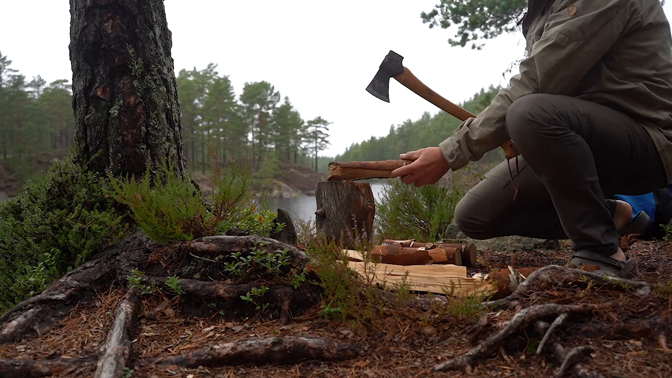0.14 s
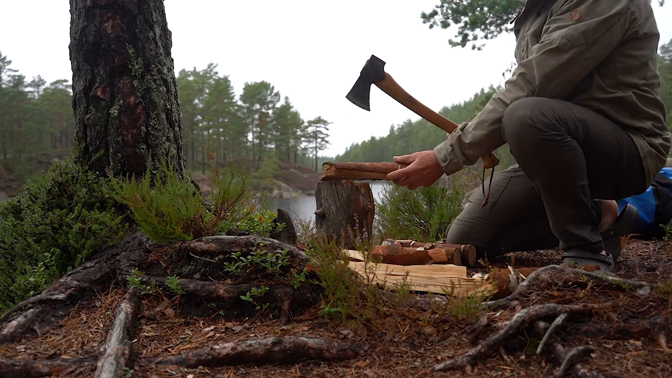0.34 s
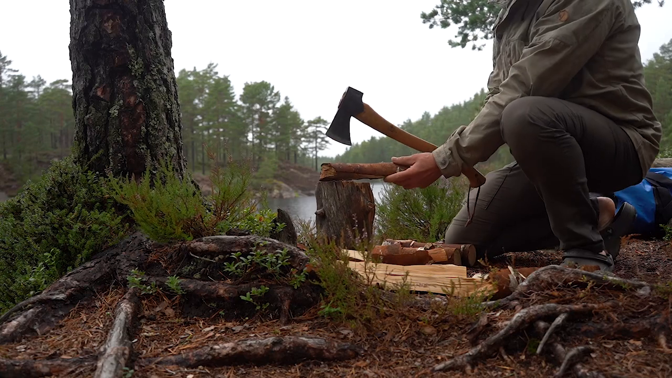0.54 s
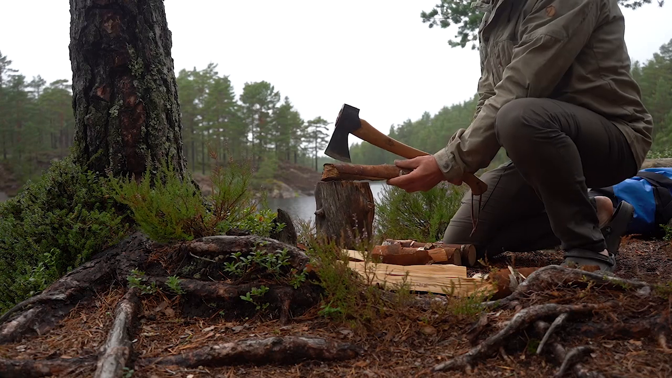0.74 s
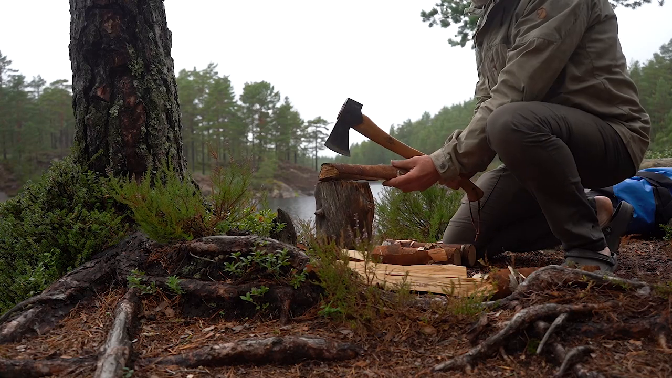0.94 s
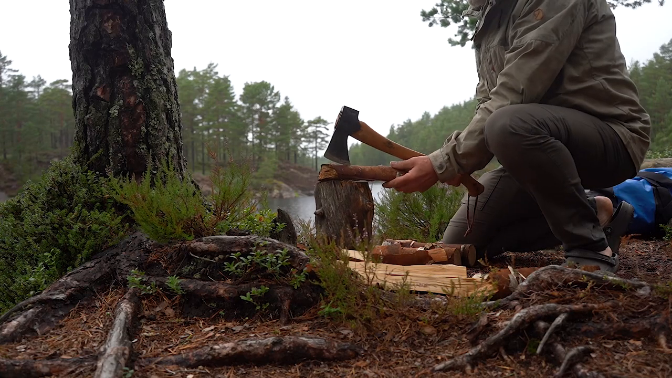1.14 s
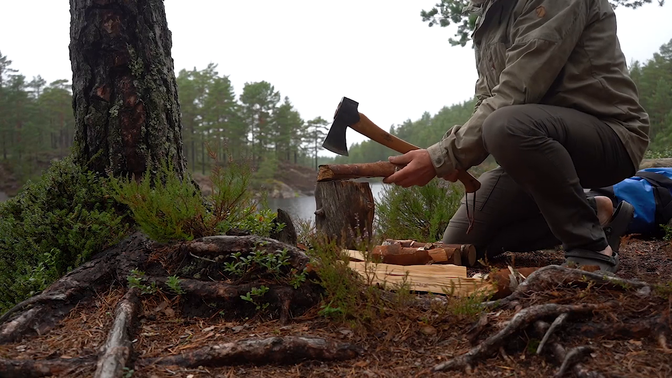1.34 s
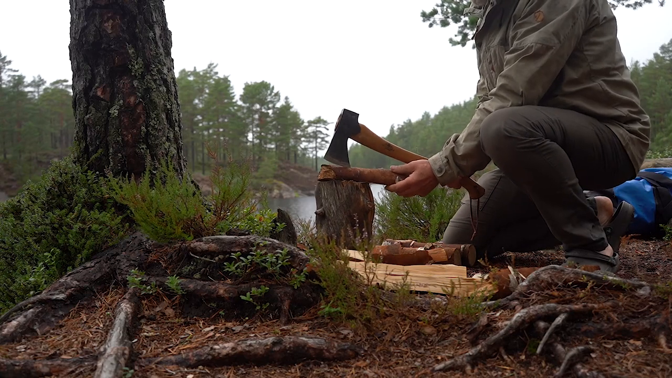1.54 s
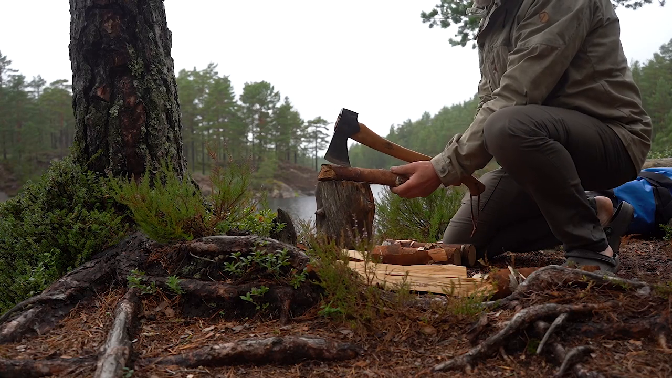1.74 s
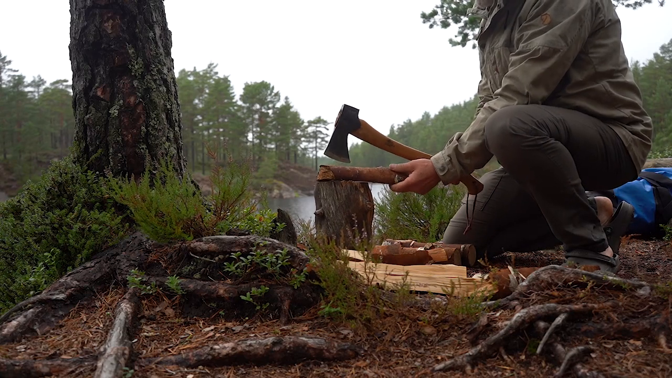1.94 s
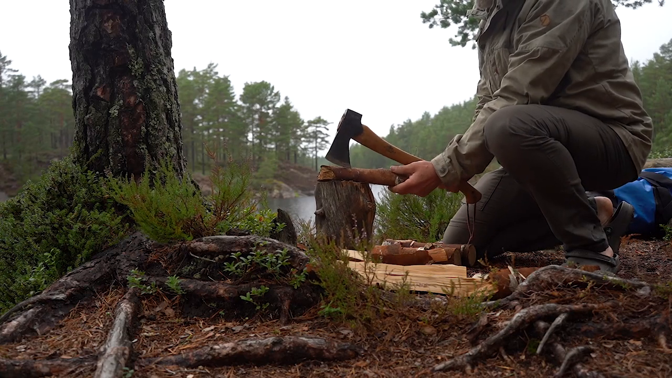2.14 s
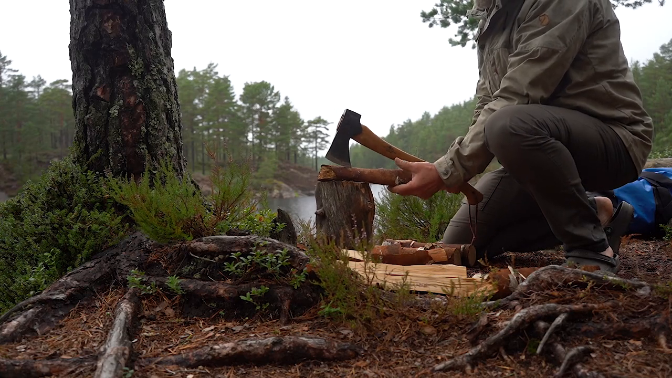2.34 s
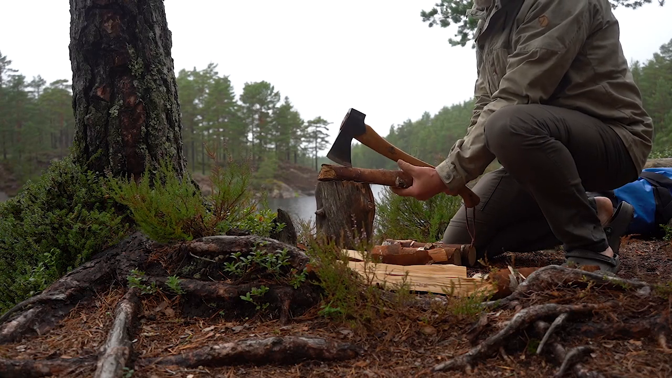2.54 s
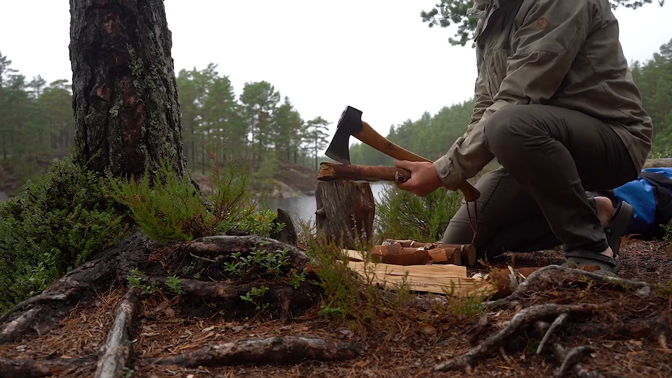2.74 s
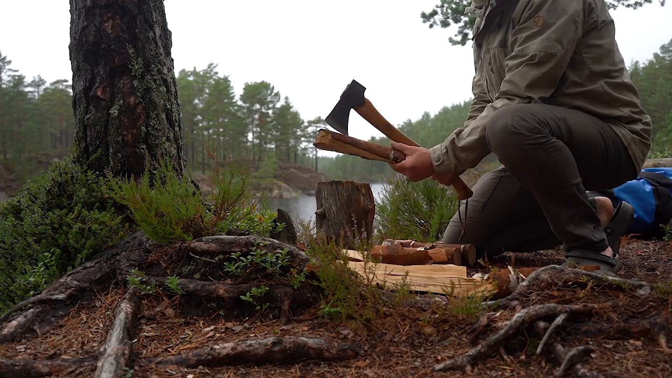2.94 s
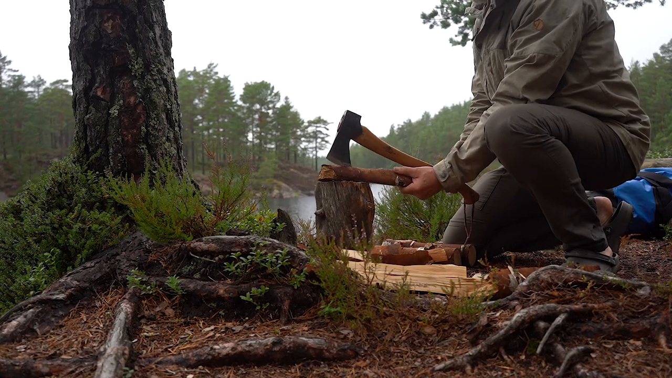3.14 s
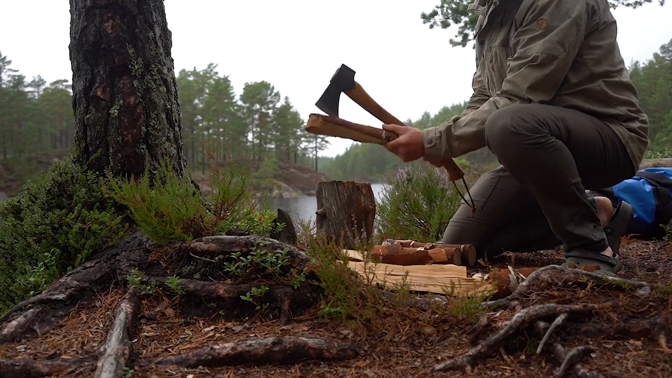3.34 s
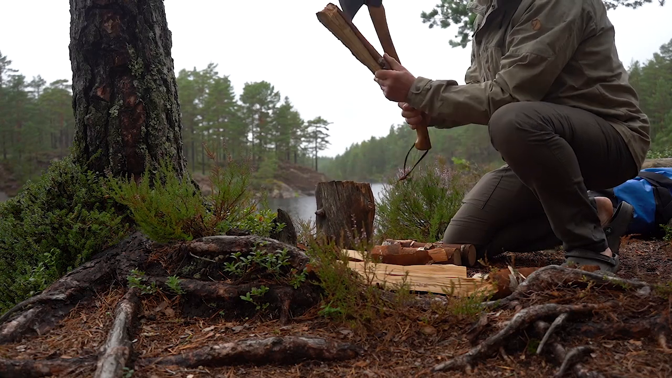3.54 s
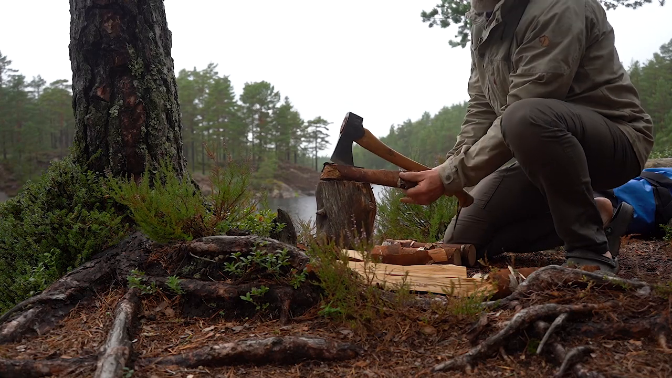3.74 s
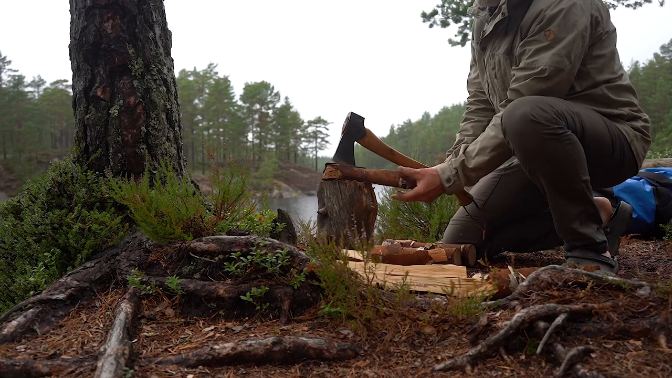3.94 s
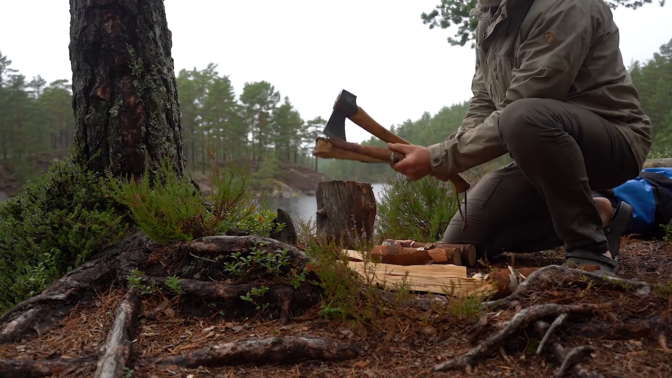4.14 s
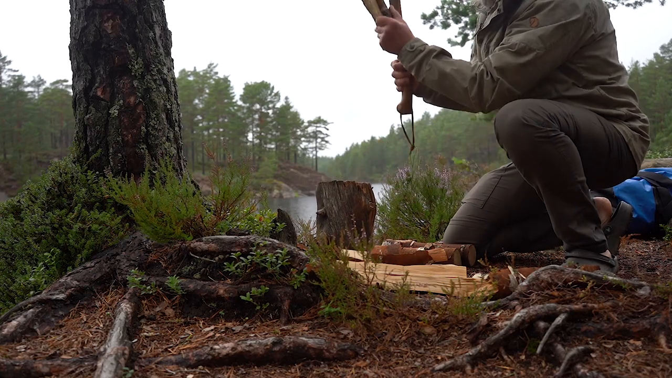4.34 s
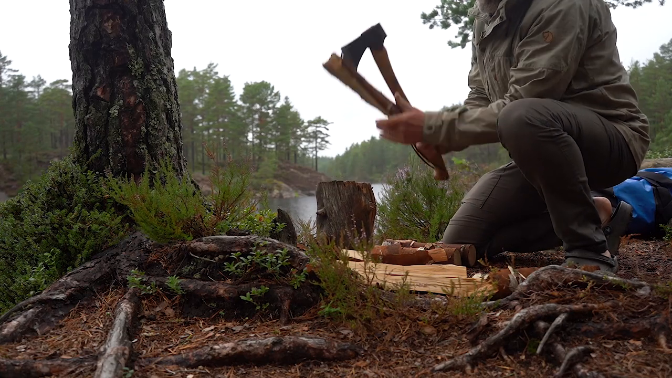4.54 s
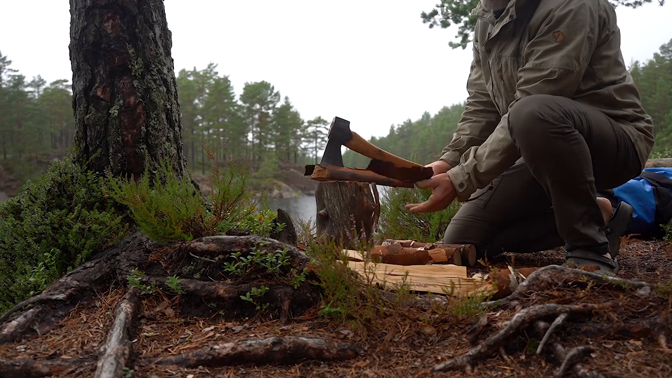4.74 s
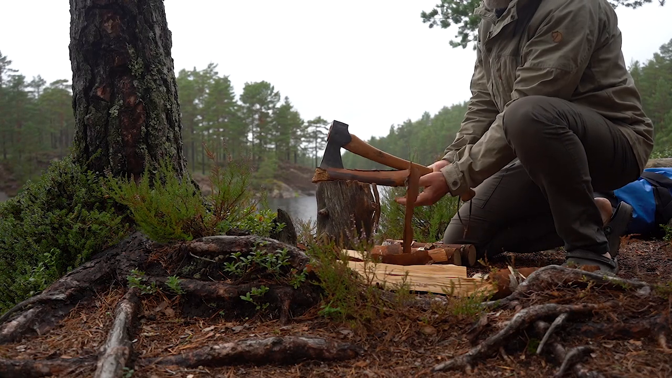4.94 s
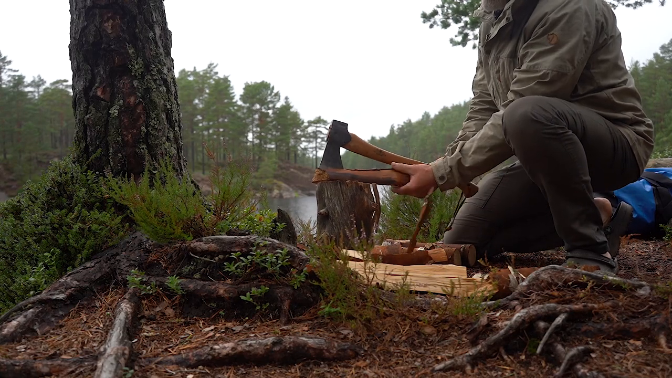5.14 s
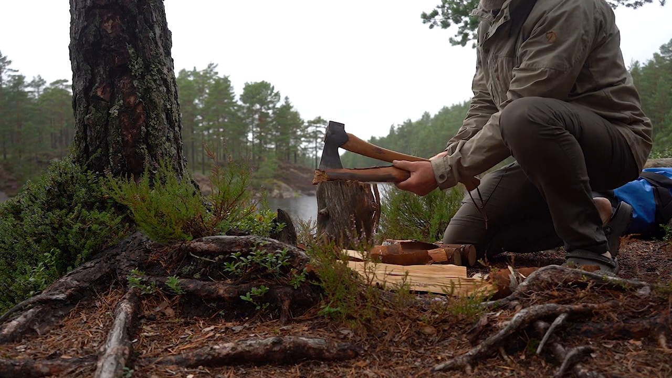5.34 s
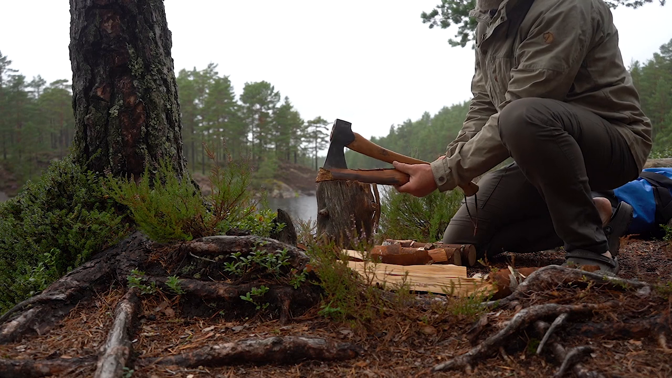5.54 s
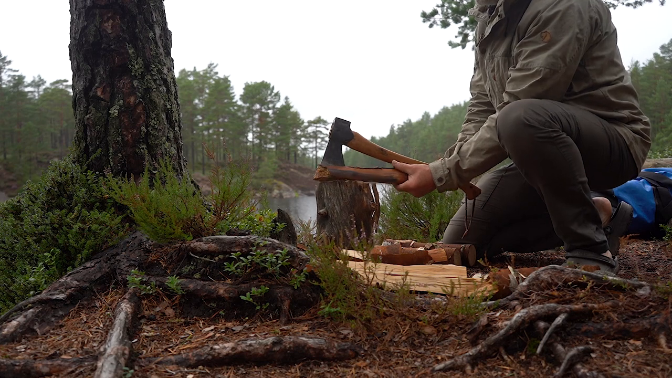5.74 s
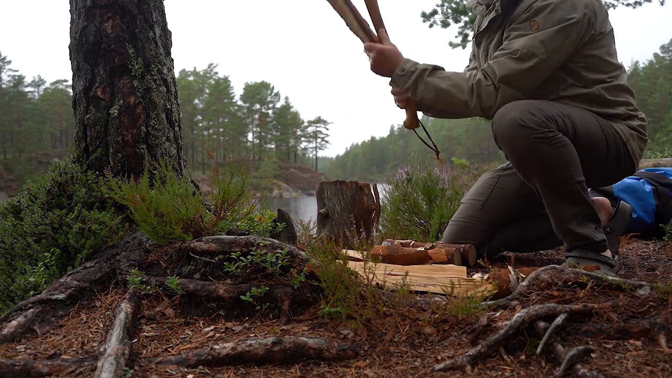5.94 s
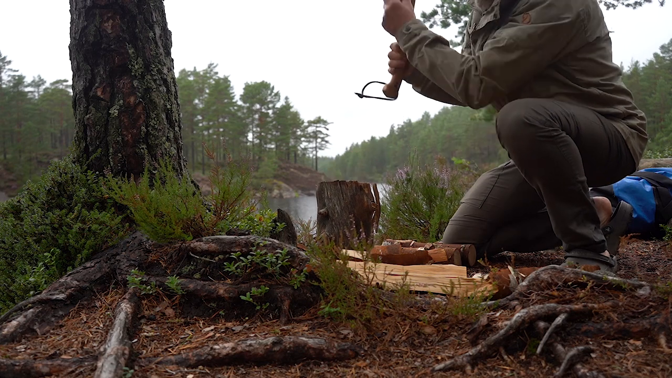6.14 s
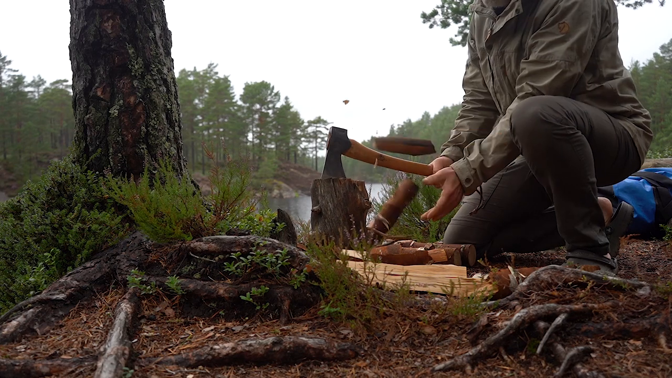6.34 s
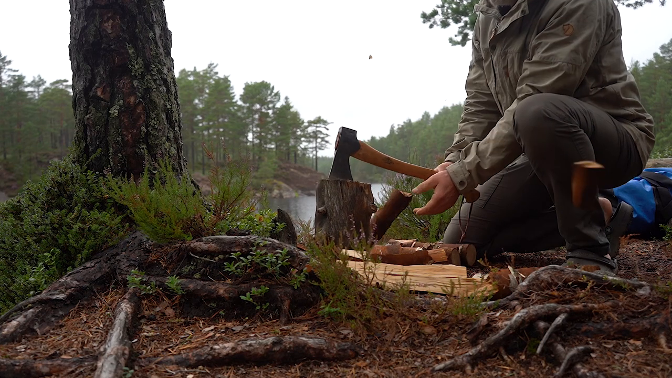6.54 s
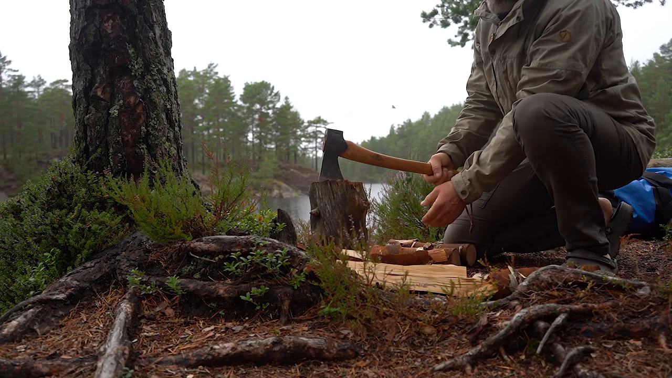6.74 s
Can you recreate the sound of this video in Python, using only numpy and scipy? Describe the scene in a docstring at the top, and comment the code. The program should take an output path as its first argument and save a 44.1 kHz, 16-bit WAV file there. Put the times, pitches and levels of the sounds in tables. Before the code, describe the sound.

In quiet woods, a kneeling person handles a stick and hatchet: cloth swishes, needles crunch, small knocks. Gentle taps seat the blade, a medium chop follows, then three strong woody cracks come over a second apart, with deep short thuds and brief trailing reflections from ground and trees. Split wood knocks and rings at the end. Near microphone, dry open air, work a little to the right.

```python
"""Splitting kindling by a lake

Someone kneels at a stump in a lakeside wood, to the right of the microphone, splitting kindling with a hatchet.
Light taps seat the blade, then heavy blows part the wood: bursts of noise and damped modes of billet and steel.
The stump thuds and soft ground thumps as low modes; loose wood knocks and rings, twigs snap, rough grain slips.
Jacket, litter and shuffling knees are shaped noise; delayed noise tails are the ground's and trees' answer."""
import sys
import numpy as np
from scipy import signal
from scipy.fft import rfft, irfft, next_fast_len
from scipy.io import wavfile
from scipy.ndimage import map_coordinates

SR = 44100
rng = np.random.default_rng(int(sys.argv[2]) if len(sys.argv) > 2 else 0)


def inscribe(sig):
    """Save sig as 16-bit PCM at rate SR to the path in sys.argv[1].

    A 1-D sig is mono; a 2-D sig holds one channel per row.
    Samples are clipped to [-1, 1] before scaling.
    """
    pcm = np.round(np.clip(np.atleast_2d(sig).T, -1, 1) * 32767)
    wavfile.write(sys.argv[1], SR, pcm.astype(np.int16))


N = 299439

# the stump driven into the ground: (t/s, level/dB)
THUDS = [(1.0845, -49.5), (1.4866, -50), (2.235, -38.5), (3.1009, -38), (3.7537, -25), (4.6787, -25.5),
         (6.3553, -24.5)]
# weight shifting on the forest floor: (peak t/s, length/s, litter crunch level/dB, dull shuffle level/dB)
SHIFTS = [(0.094, 0.603, -69.5, -61.5), (0.484, .12, -72, -52.5), (.68, 0.1705, -89, -59),
          (0.863, 1, -72.5, -60), (1.472, 0.25, -69, -61.5), (2.197, 1, -81.5, -71.5),
          (3.253, 0.15, -78, -58.5), (3.896, 0.071, -73, -66.5), (5.149, .5, -73.5, -64.5),
          (5.75, 1, -78, -67), (6.65, 0.4481, -77, -60)]
# arm movements in the jacket; each heavy blow has a lift and a faster downswing:
# (peak t/s, length/s, swish level/dB, cloth grain level/dB)
SWISHES = [(0.083, 0.1567, -60, -63.5), (0.458, 0.41, -64, -63.5), (0.865, 0.88, -67.5, -76),
           (1.388, .45, -71.5, -96), (2.49, 0.6, -74.5, -86.5), (2.889, 0.14, -66.5, -86),
           (3.07, .1, -71, -82), (3.568, 0.17, -67.5, -69), (3.699, 0.0888, -61, -74),
           (4.396, 0.23, -63, -71), (4.64, .12, -55.5, -70), (4.792, 0.44, -63.5, -67),
           (5.202, 0.2, -65.5, -78.5), (5.547, 0.41, -69, -78), (6.065, 0.39, -63, -70),
           (6.293, 0.093, -51.5, -62)]
# colour of a snapping twig or needle: (f/Hz, level/dB)
SNAP = [(400, 0.5), (1300, 1), (4400, -3), (10000, -7)]


def amp(db):
    """Decibels to gain."""
    return 10 ** (np.asarray(db) / 20)


def unit(x):
    """Scale to rms 1."""
    return x / np.sqrt(np.mean(x ** 2) + 1e-20)


def along(points, hz):
    """Read (f/Hz, value) points on a log frequency axis."""
    f, v = np.transpose(points)
    return np.interp(np.log(hz + 1), np.log(f + 1), v)


def wobble(rate):
    """A smooth random curve, rate knots a second."""
    knots = rng.standard_normal(int(N * rate / SR) + 4)
    return map_coordinates(knots, [np.arange(N) * rate / SR])


def filtered(x, response):
    """Multiply the spectrum of x by a response of frequency."""
    n = x.shape[-1]
    m = next_fast_len(n + SR // 8)
    return irfft(rfft(x, m) * response(np.fft.rfftfreq(m, 1 / SR)), m)[..., :n]


def coloured(x, gain_db, size=4096):
    """Minimum-phase filter with the given dB curve: nothing sounds before the contact."""
    cepstrum = irfft(np.log(amp(gain_db(np.fft.rfftfreq(size, 1 / SR)))))
    fold = np.r_[1, np.full(size // 2 - 1, 2), np.zeros(size // 2)]
    impulse = irfft(np.exp(rfft(cepstrum * fold)))
    return signal.fftconvolve(x, impulse[None], axes=1)


def paired(x):
    """Two unrelated signals become a stereo pair, most alike in the bass."""
    # (f/Hz, left-right likeness)
    likeness = [(200, 1), (500, 0.85), (1400, 0.54), (3500, 0.08), (9000, 0.32)]
    turn = lambda hz: np.arccos(np.clip(along(likeness, hz), -1, 1)) / 2
    mid, side = filtered(x, lambda hz: np.array([np.cos(turn(hz)), np.sin(turn(hz))]))
    return np.array([mid + side, mid - side])


def panned(x, pan_db):
    """Make the left channel pan_db louder than the right."""
    return x * amp([[pan_db / 2], [-pan_db / 2]])


def to_the_right(x, share):
    """The work lies right of the microphone; share scales how far right the sound leans, 0 is centred."""
    # (f/Hz, left-right level/dB at share 1)
    sideways = [(300, 0), (1400, -1.5), (4000, -2), (10000, -4)]
    return filtered(x, lambda hz: amp(share * along(sideways, hz) * np.array([[.5], [-.5]])))


def rush(spectrum, spiky=0):
    """Stereo noise of rms 1 with this spectrum; spiky clumps it into tiny grains."""
    grains = rng.standard_normal((2, N)) * amp(spiky * wobble(790))
    return unit(filtered(paired(grains), lambda hz: amp(along(spectrum, hz))))


def add(out, s, x):
    """Mix x into out from time s."""
    part = out[:, round(s * SR):][:, :x.shape[-1]]
    part += x[..., :part.shape[1]]


def ring(modes, rise):
    """Damped modes (f/Hz, level/dB, t60/s), each struck at a slightly new strength; rise in seconds."""
    t = np.arange(SR // 2) / SR
    tones = 0
    for hz, db, t60 in modes:
        tones = tones + amp(db + rng.normal() - 60 * t / t60) * np.sin(2 * np.pi * hz * t)
    return tones * (1 - np.exp(-t / rise))


def stick_modes(pitch_hz, hold):
    """A stick's modes at this pitch; a firm hold shortens their ring."""
    # (multiple of the pitch, level/dB, t60/s at hold 1)
    modes = [(0.372, -27.5, 0.042), (0.689, -6.5, 0.077), (.8, -5.5, 0.069), (1, 1.5, .11),
             (1.35, -29.5, .07), (1.779, -14.5, 0.075)]
    return [(pitch_hz * ratio, db, t60 / hold) for ratio, db, t60 in modes]


def voiced(colour, db, tilt_db, bite_db=0):
    """A contact's colour at this strength: sharper contacts tilt it up, breaking fibres add bite."""
    pivot_hz, bite_hz, bite_octaves = 2000, 1850, 1.05
    bite = lambda hz: np.exp(-(np.log2(hz / bite_hz) / bite_octaves) ** 2)
    return [(hz, db + level + tilt_db * np.log2(hz / pivot_hz) + bite_db * bite(hz)) for hz, level in colour]


def contact(colour, life, crush_hz, resonances=(), size=1024):
    """One contact: a clean push below crush_hz, a burst of breaking fibres (60 dB in life s) above it."""
    t = np.arange(size) / SR
    burst = amp(-60 * t / life) * (1 - np.exp(-t / 0.00067))
    fibres = unit(paired(rng.standard_normal((2, size))) * burst) / np.sqrt(size)
    click = np.ones((2, 1)) * (t == 0)
    push = coloured(click, lambda hz: -10 * np.log10(1 + (hz / crush_hz) ** 4))
    crack = coloured(fibres, lambda hz: -10 * np.log10(1 + (crush_hz / (hz + 1)) ** 2))
    # extend the colour into deep bass and high treble
    shape = [(30, colour[0][1] - 22), (130, colour[0][1] - 2), *colour, (16000, colour[-1][1] - 8)]

    def body(hz):
        humps = sum(db / (1 + (2 * (hz - centre) / width) ** 2) for centre, width, db in resonances)
        return along(shape, hz) + humps

    return coloured(crack - push, body)


def scatter(decay, seconds):
    """A diffuse stereo echo of energy 1, each frequency dying at its own speed."""
    noise = paired(rng.standard_normal((2, int(seconds * SR))))
    hz, t, z = signal.stft(noise, SR, nperseg=128)
    fade = amp(-60 * t / along(decay, hz)[:, None])
    tail = signal.istft(z * fade, SR, nperseg=128)[1]
    return unit(tail) / np.sqrt(tail.shape[1])


def outdoors(x, near_db, far_db):
    """The direct sound, a quick spray off roots and trunks, and a faint answer from the trees."""
    # nearby ground and trunks: (f/Hz, t60/s)
    near_decay = [(150, 0.023), (500, 0.079), (1500, 0.095), (5000, 0.091), (14000, 0.059)]
    # far trees: (f/Hz, t60/s)
    far_decay = [(150, 1.1), (1500, 0.87), (6000, .9), (14000, .55)]
    paths = np.zeros((2, SR))
    paths[:, 0] = 1
    add(paths, .004, amp(near_db) * scatter(near_decay, seconds=1 / 4))
    add(paths, .025, amp(far_db) * scatter(far_decay, seconds=0.9195))
    return signal.fftconvolve(x, paths, axes=1)


def swells(rows):
    """Gain of overlapping movements (peak t/s, length/s, level/dB), speeding up to a peak and slowing."""
    rise_share = .52  # the part of a movement spent speeding up
    shape = 1.3  # 1 pointed, 2 bell
    t, power = np.arange(N) / SR, np.zeros(N)
    for s, length, db in rows:
        away = np.maximum((s - t) / rise_share, (t - s) / (1 - rise_share)) / length
        power += amp(db) ** 2 * np.exp(-2 * away ** shape)
    return np.sqrt(power + 1e-20)


def air():
    """The hush of still forest air: steady noise, strongest in the bass."""
    # (f/Hz, level/dB per Hz)
    spectrum = [(22, -25.5), (45, -7.5), (75, -0.5), (300, -4), (800, -12.5), (1700, -18), (2700, -23),
                (9700, -24.5), (16000, -31.5)]
    return amp(-68.0) * rush(spectrum)


def ticks():
    """Twigs give way under knee and boot; hand and haft bump the wood: short broken-fibre contacts."""
    # the clearest snaps and handling bumps: (t/s, strength/dB, tilt/dB per octave)
    snaps = [(.011, -23.5, 1), (.078, -28, -5), (0.1371, -28.5, 3.5), (.164, -18.5, 1), (0.172, -37, -4),
             (0.195, -25.5, -1.5), (0.255, -26.5, 1.5), (.28, -36, 7), (0.376, -37.5, 7), (.561, -24, 0.5),
             (0.7257, -22, 2), (.776, -21.5, 1.5), (0.789, -20.5, -0.5), (0.899, -26, 0.5),
             (1.519, -28.5, 2.5), (2.345, -36, -2), (2.529, -35.5, -1), (2.575, -29.5, -1.5),
             (3.332, -27.5, 1.5), (3.939, -35.5, 4), (4.092, -33.5, 3.5), (4.143, -28.5, -2.5),
             (5.017, -23.5, -0.5), (5.029, -24.5, 0), (5.085, -36, -7), (5.133, -35, -6), (5.215, -30.5, 1),
             (5.419, -30.5, -7), (5.534, -27.5, -0.5), (6.084, -25, -1), (6.419, -14.5, -3.5)]
    out = np.zeros((2, N))
    for s, db, tilt_db in snaps:
        snap = contact(voiced(SNAP, db, tilt_db), life=.009, crush_hz=1200)
        add(out, s, outdoors(snap, near_db=-2.0, far_db=-27))
    return out


def jacket():
    """Sleeves swish as grainy rubbing noise; fast swings add a hollow whoosh that grows with speed."""
    # rubbing cloth: (f/Hz, level/dB per Hz)
    cloth = [(200, -14.5), (450, -5.5), (900, -6), (1650, -2.5), (2500, -7), (5000, -13.5), (15000, -25)]
    # hollow note of the fastest swing: (f/Hz, level/dB per Hz)
    hollow = [(900, -35.5), (1400, -8), (1700, 0), (1900, -16), (3200, -41.5)]
    whoosh_db, whoosh_grows = -53.5, 2.4  # level at the fastest swing; dB gained per dB of swish
    arms = swells([(s, length, db) for s, length, db, _ in SWISHES])
    swish = arms * amp(1.3 * wobble(40)) * rush(cloth, spiky=0.94)
    whoosh = amp(whoosh_db) * (arms / arms.max()) ** whoosh_grows * rush(hollow)
    return swish + whoosh


def debris():
    """Gain of the bark crumbs that trickle down after each thud."""
    start_db, fade_db_per_s = -35, 63  # start relative to the thud
    t = np.arange(N) / SR
    return sum((t > s) * amp(db + start_db - fade_db_per_s * np.abs(t - s)) for s, db in THUDS)


def crackles(pressure):
    """Needles snap at random, louder the harder the litter is pressed."""
    per_s, level_db, spread_db = 24, 35.5, 4  # level relative to the pressure
    out = np.zeros((2, N))
    for place, size, tilt in rng.random((int(per_s * N / SR), 3)):
        colour = voiced(SNAP, level_db + spread_db * (2 * size - 1), 2 * tilt)
        snap = contact(colour, life=.012, crush_hz=1200)
        add(out, place * N / SR, pressure[int(place * N)] * snap)
    return out


def litter():
    """Needles and bark crunch under weight, with falling crumbs and cloth grain in the same spiky noise."""
    # (f/Hz, level/dB per Hz)
    spectrum = [(1200, -24.5), (2800, -5), (4500, 0), (8000, -2), (12000, -6), (16000, -9)]
    pressure = swells([(s, length, db) for s, length, db, _ in SHIFTS])
    weave = swells([(s, length, db) for s, length, _, db in SWISHES])
    grain = np.sqrt(pressure ** 2 + debris() ** 2 + weave ** 2)
    crunch = grain * amp(1.0 + 1.1 * wobble(52)) * rush(spectrum, spiky=3.1)
    return crunch + crackles(pressure)


def shuffle():
    """Knees shuffle on soft ground: dull noise that swells and flutters with the shifting weight."""
    # (f/Hz, level/dB per Hz)
    spectrum = [(22, -27), (45, -5), (70, -1.5), (140, -5.5), (330, -8.5), (700, -21.5), (1500, -46)]
    weight = swells([(s, length, db) for s, length, _, db in SHIFTS])
    return weight * amp(-2.5 + 2.4 * wobble(19)) * rush(spectrum)


def scrapes():
    """Rough grain catches and slips unevenly; each slip sheds a burst of grit and excites the stick."""
    # wood dragged over the stump or along the blade: (t/s, length/s, level/dB, ring pitch f/Hz)
    drags = [(0.288, 0.035, -60.5, 1475), (0.415, 0.038, -50.5, 810), (0.444, .02, -54, 520),
             (0.48, 0.03, -54, 800), (0.55, 0.057, -55.5, 1142), (1.46, 0.047, -63, 2300),
             (5.009, 0.016, -56, 1680)]
    # (f/Hz, level/dB per Hz)
    grit_spectrum = [(150, -1), (500, -0.5), (1600, -1.5), (4000, -9.5), (10000, -7), (16000, -21)]
    slip_s, grit_db, ring_db = 0.01, -2.5, -8  # 60 dB life of a slip; levels relative to the scrape
    out = np.zeros((2, N))
    fade = amp(-60 * np.arange(SR // 50) / SR / slip_s)
    for s, length, db, pitch_hz in drags:
        n = int(length * SR)
        when = (np.cumsum(rng.uniform(.0002, .003, size=80)) * SR).astype(int)
        slips = np.bincount(when, rng.standard_normal(80), minlength=n)[:n]
        slips = slips * signal.windows.tukey(n, .3)
        bursts = signal.fftconvolve(np.abs(slips), fade)
        noise = paired(rng.standard_normal((2, SR // 4)))[:, :len(bursts)]
        grit = filtered(noise * bursts, lambda hz: amp(along(grit_spectrum, hz)))
        modes = stick_modes(pitch_hz, hold=1.5)
        tone = signal.fftconvolve(slips, ring(modes, rise=0.0007))[:n + SR // 20]
        add(out, s, outdoors(amp(db + grit_db) * unit(grit), near_db=-4.5, far_db=-23))
        add(out, s, amp(db + ring_db) * unit(tone))
    return out


def bumps():
    """Knee and boot press the peaty ground: soft, hollow thumps of low modes, each slightly retuned."""
    # (t/s, relative level/dB)
    presses = [(0.454, -50), (2.031, -50), (2.079, -53.5), (2.14, -60), (4.967, -42.5), (5.13, -51),
               (5.347, -42.5), (5.48, -48), (5.619, -63.5), (5.673, -46.5), (5.721, -41), (5.771, -43),
               (5.848, -49.5), (5.917, -51.5), (6.639, -50)]
    # modes of the soft ground: (f/Hz before retuning, level/dB, t60/s)
    ground = [(54.7, 1, 0.077), (84.6, 3, 0.05735), (125, -3, 0.042), (200.06, -36, 0.0092)]
    out = np.zeros((2, N))
    for s, db in presses:
        size = np.exp(.15 * rng.normal())
        modes = [(hz / size, level, t60) for hz, level, t60 in ground]
        add(out, s, amp(db + 5.5) * ring(modes, rise=0.0095))
    return out


def sticks():
    """Sticks knock and ring at their own pitches; among them, light blade touches and a blade pulled free."""
    # (t/s, strength/dB, tilt/dB per octave, bite/dB, ring pitch f/Hz, ring level/dB,
    # damping [1 = free], left-right level/dB)
    knocks = [(.6527, -6, 4.5, 2.5, 1700, -29.5, 8.6, 2), (0.7311, -5.5, -1.5, 7, 936, -29.5, 0.83, -6),
              (0.7375, 4.5, -1, -1, 1750, -32.5, 2.5, 0), (1.875, -16.5, 5.6, 6, 747.8, -50.5, 4.753, 1.5),
              (4.962, -7.5, 0.2957, -9.5, 860, -47.5, 0.89, -0.5),
              (5.349, -19.5, -2.5, 3, 1547, -50, 2.3, 0), (6.4775, 15, 1, 5.5, 1310, -15.5, 3.7, -1.5),
              (6.4828, 6, 5, 0, 1562, -26.5, 1.14, 0), (6.4844, 10, 2.5, -6, 1167, -8.5, 4.9, 1),
              (6.7487, 3, 5.5, -33.5, 4530, -52.5, 1.3, -8.5), (6.751, -24.5, 1, 0, 249, -37, 3.2, 1.5),
              (6.7696, 5.5, -1, 1.5, 2258, -26.5, 1.44, -12.5), (6.778, -3, 0.5, 6, 2035, -29, 2, 10.5)]
    # colour of a knock: (f/Hz, level/dB)
    knock_colour = [(400, 1.5), (1300, 1.5), (2500, -4.5), (4400, -10), (10000, -22)]
    # peaks and a dip in the tone of every knock: (f/Hz, width/Hz, level/dB)
    peaks = [(699.2, 230, -4.5), (923, 93, 6.5), (1200, 114, 3.5)]
    out = np.zeros((2, N))
    for s, db, tilt_db, bite_db, pitch_hz, ring_db, hold, pan_db in knocks:
        knock = np.zeros((2, SR // 4))
        colour = voiced(knock_colour, db, tilt_db, bite_db)
        add(knock, 0, amp(-4.5) * contact(colour, life=0.01, crush_hz=2300, resonances=peaks))
        add(knock, 0, amp(ring_db) * ring(stick_modes(pitch_hz, hold), rise=0.00056))
        add(out, s, panned(outdoors(knock, near_db=-9.5, far_db=-36.0), pan_db))
    return out


def chop(colour, ring_db, pitch_hz, billet_db):
    """One contact cracks the held billet and rings both it and the hatchet."""
    # wood resonances, with a dip near 700 Hz from the ground reflection: (f/Hz, width/Hz, level/dB)
    peaks = [(343, 58, 6), (452.74, 250, 8), (725, 54, -14), (810, 70, 1), (926, 9.1, 4.5), (1320, 190, 4),
             (1550, 130, 5), (1750, 63, 6), (2643.5, 440, 5), (3380, 980, -3), (4300, 460, 3)]
    # the steel head on its haft: (f/Hz, level/dB, t60/s)
    hatchet = [(312.53, -8.5, 0.18), (2370, -3, 0.1), (2912, -8.5, 0.037), (4500, -14.5, .07),
               (5681, -8.5, .035), (6100, -14.5, .07)]
    blow = np.zeros((2, SR // 4))
    add(blow, 0, amp(-1.0) * contact(colour, life=.017, crush_hz=2030, resonances=peaks))
    add(blow, 0, amp(ring_db - 2.0) * ring(hatchet, rise=0.00036))
    add(blow, 0, amp(billet_db) * ring(stick_modes(pitch_hz, hold=5.7), rise=0.00066))
    return outdoors(blow, near_db=-9.0, far_db=-35.5)


def chops():
    """Taps seat the blade, and each heavy blow drives it through in a few quick contacts."""
    # light taps, and the billet knocking on the stump just after the third: (t/s, strength/dB, tilt/dB per
    # octave, hatchet ring level/dB, billet pitch f/Hz, billet ring level/dB)
    taps = [(1.0837, -1.5, -0.5, -56.5, 377.6, -46), (1.4857, -4.5, -0.4278, -47, 414, -38),
            (2.235, 3, 3, -45.5, 2890, -32.5), (2.2419, -4, 0, -66, 450, -33)]
    # contacts of blade, billet and stump: (t/s, strength/dB, tilt/dB per octave, bite/dB,
    # billet pitch f/Hz, billet ring level/dB, left-right level/dB)
    blows = [(3.1007, 2.5, -4, -2, 1510, -19, -0.5), (3.1104, 0.5, -0.8, -1.5, 1510, -28.5, 0),
             (3.7547, 13.5, -3, -4.5, 1530, -12.5, 0), (3.762, 13.5, 1.8, -2, 948, -14.5, -1),
             (3.7685, 10.5, 1.2, -7.5, 3296, -21, 0.5), (4.6788, 8.5, 0, 12, 1950, -10.5, -1),
             (4.6824, 10.5, 2, -0.5, 2300, -16.5, -1), (4.685, -6.5, 0.5, 0.5, 215, -15, 0),
             (4.6872, 10, 1.5, -2.5, 810, -12, 2), (6.3555, 10, 2.4, 11, 2073, -14.5, 0),
             (6.3624, 8, 1, 1, 2580, -21.5, 2.5)]
    # colour of a tap: (f/Hz, level/dB)
    tap_colour = [(400, 0.5), (1300, -26.5), (2500, -9.5), (4400, -19), (10000, -29)]
    # colour of a blow: (f/Hz, level/dB)
    blow_colour = [(400, -1.5), (1300, -0.5), (2500, -2), (4400, -4), (10000, -13.5)]
    buried_db = -62  # ring of the hatchet stuck in the wood, against the blow's strength
    wood = np.zeros((2, N))
    for s, db, tilt_db, ring_db, pitch_hz, billet_db in taps:
        add(wood, s, chop(voiced(tap_colour, db, tilt_db), ring_db, pitch_hz, billet_db))
    for s, db, tilt_db, bite_db, pitch_hz, billet_db, pan_db in blows:
        colour = voiced(blow_colour, db, tilt_db, bite_db)
        add(wood, s, panned(chop(colour, db + buried_db, pitch_hz, billet_db), pan_db))
    return to_the_right(wood, share=0.87)


def stump():
    """The stump bounces on roots and soil: a slow-rising thud of low modes under each chop."""
    # (f/Hz, level/dB, t60/s)
    modes = [(48.5, -10, 0.094), (51.464, -8.5, 0.52), (68, -12.5, 0.19), (116, -1, .16),
             (162, -10.5, 0.059), (224, -5, 0.1)]
    out = np.zeros((2, N))
    for s, db in THUDS:
        add(out, s, amp(db) * ring(modes, rise=0.0075))
    return out


def scene():
    """The work, over the hush of still forest air."""
    handling = ticks() + jacket() + litter() + shuffle() + scrapes()
    return air() + to_the_right(handling, share=0.33) + bumps() + sticks() + chops() + stump()


def record(dry):
    """Deepest bass is rolled off; a steep low-pass ends the sound at 16 kHz."""
    top_hz = 16000
    lean = signal.sosfilt(signal.butter(3, 34, "highpass", fs=SR, output="sos"), dry)
    return filtered(lean, lambda hz: 1 / np.sqrt(1 + (hz / top_hz) ** 200))


dry = scene()
out = record(dry)
inscribe(out)
```